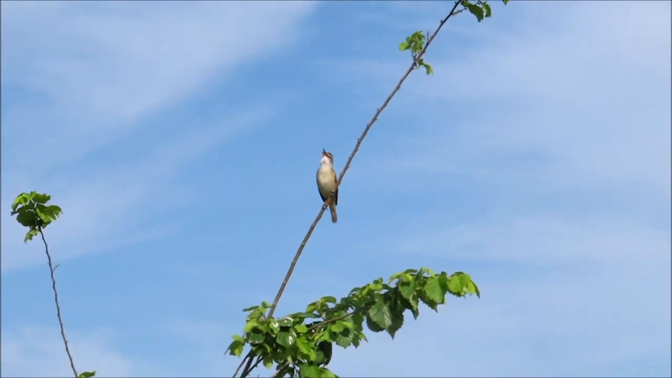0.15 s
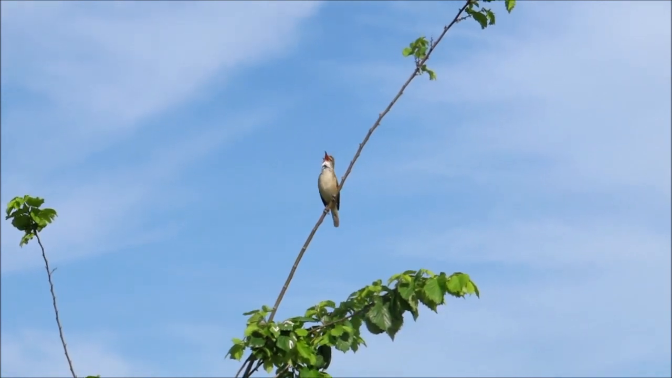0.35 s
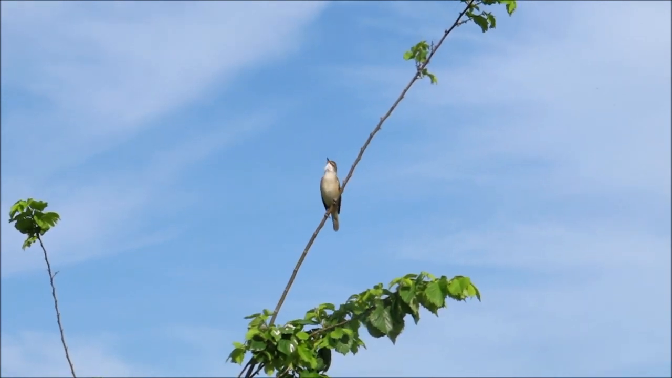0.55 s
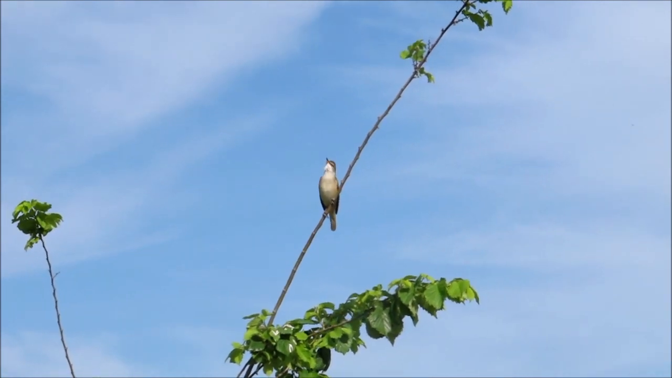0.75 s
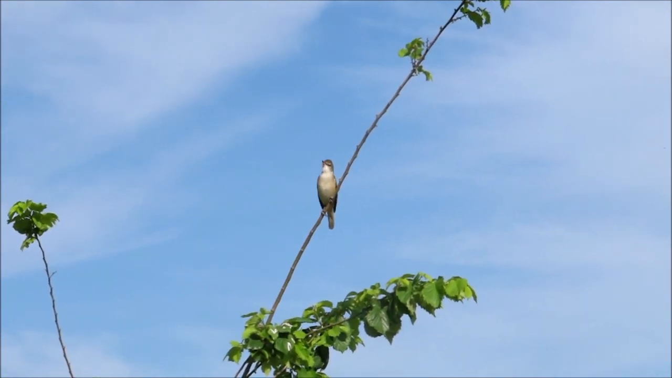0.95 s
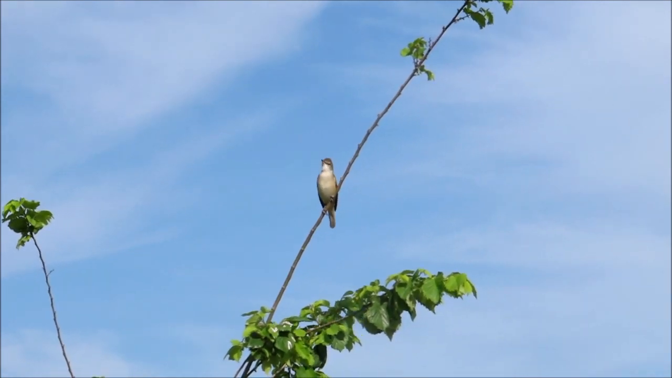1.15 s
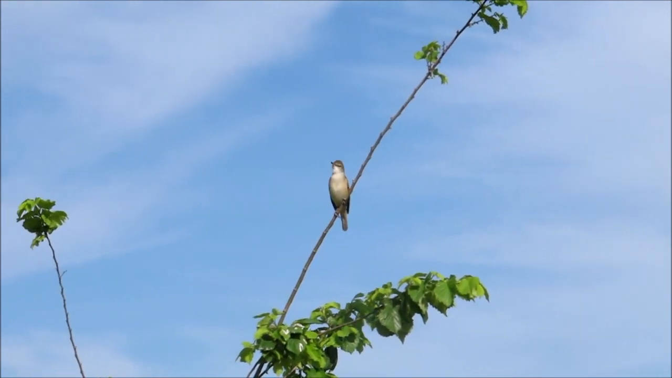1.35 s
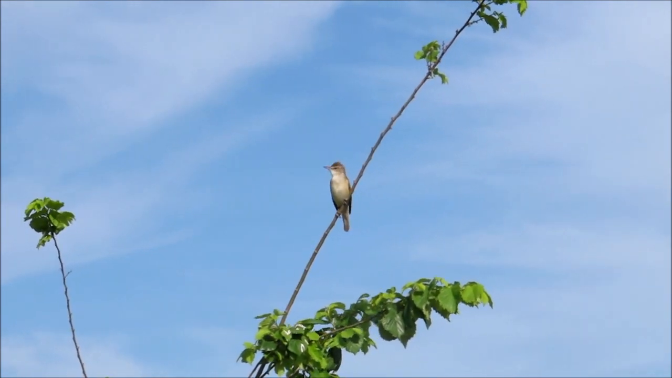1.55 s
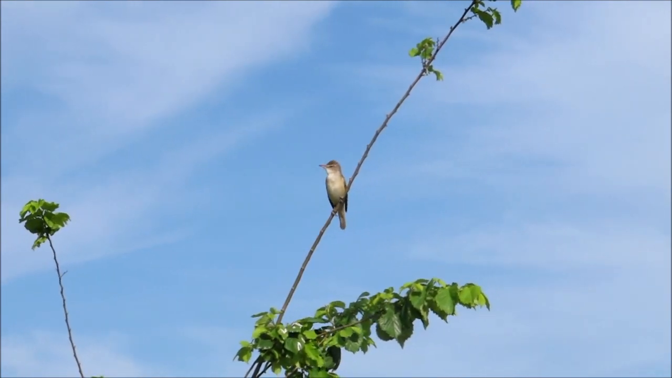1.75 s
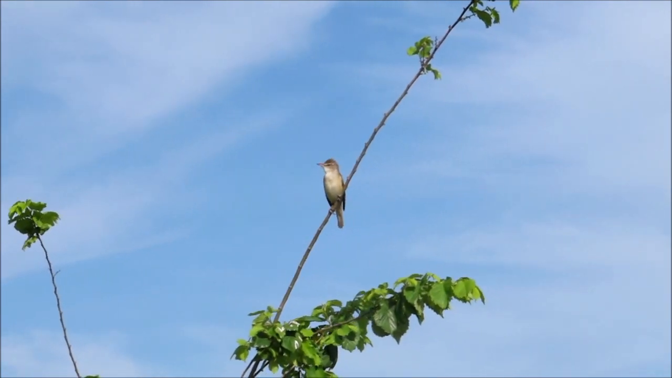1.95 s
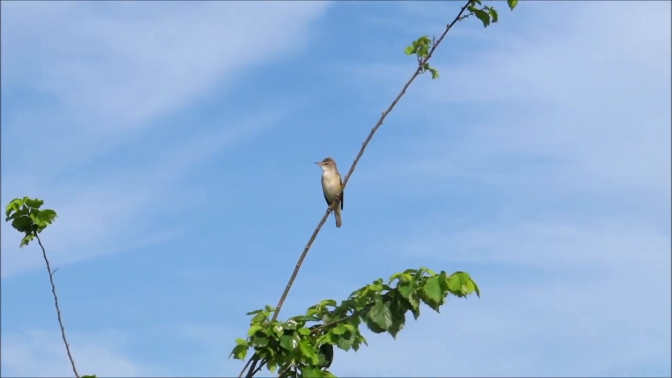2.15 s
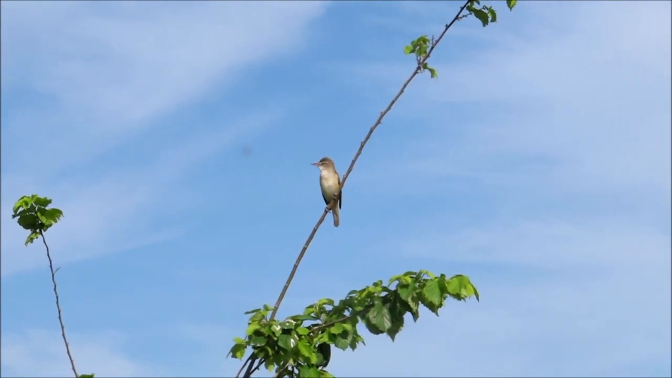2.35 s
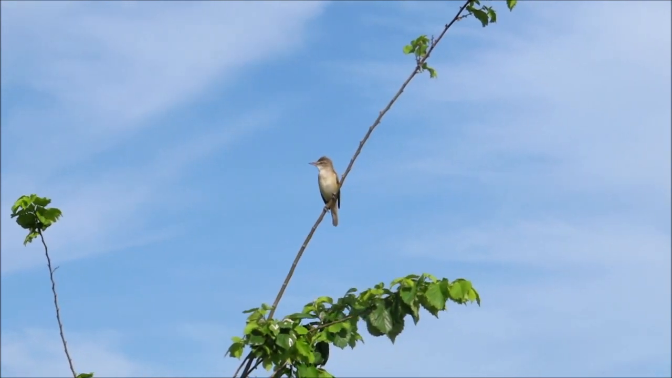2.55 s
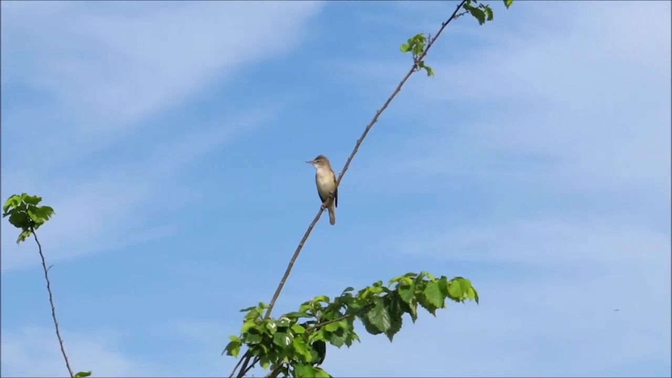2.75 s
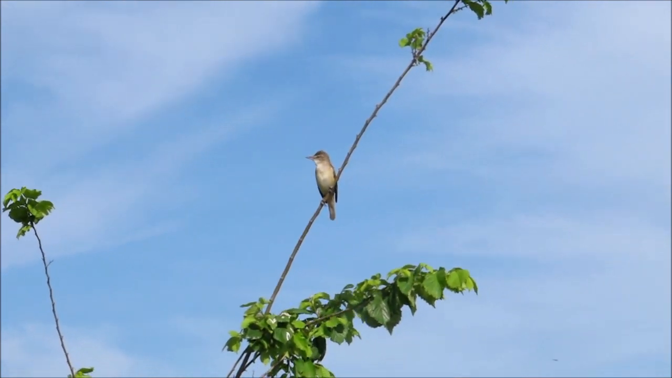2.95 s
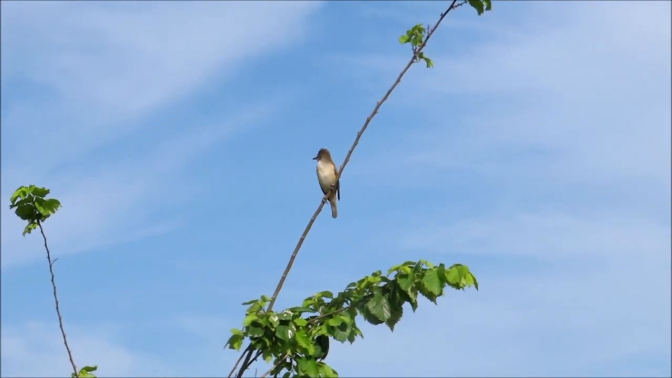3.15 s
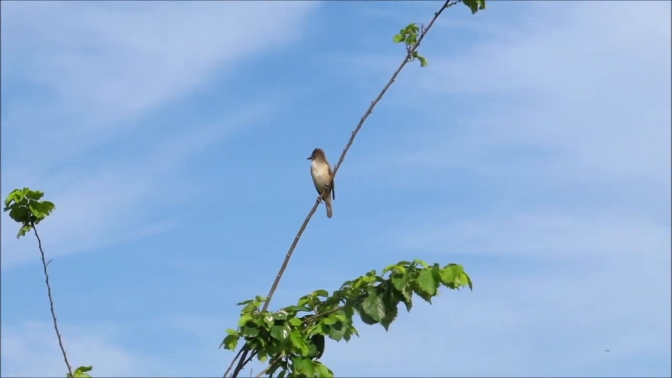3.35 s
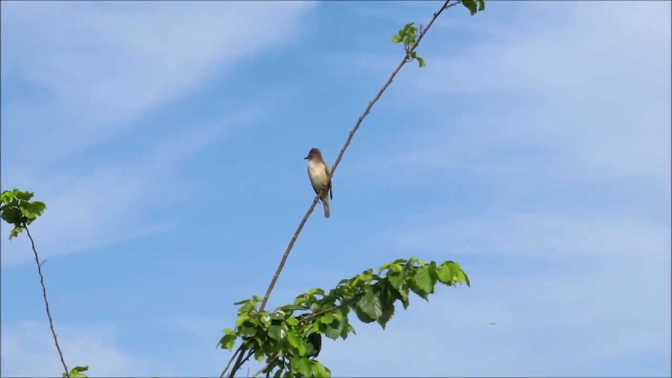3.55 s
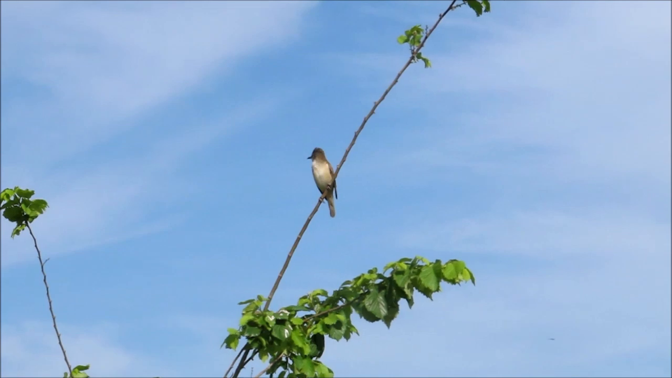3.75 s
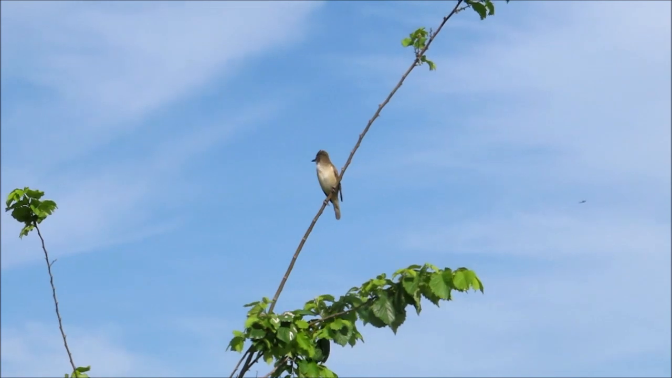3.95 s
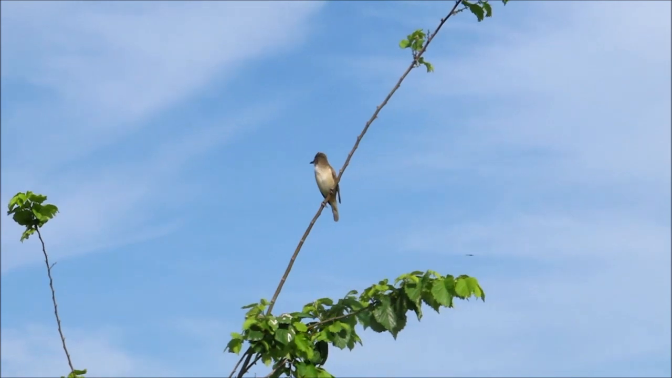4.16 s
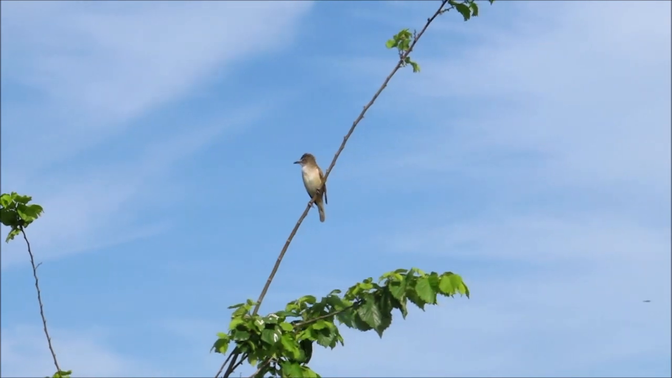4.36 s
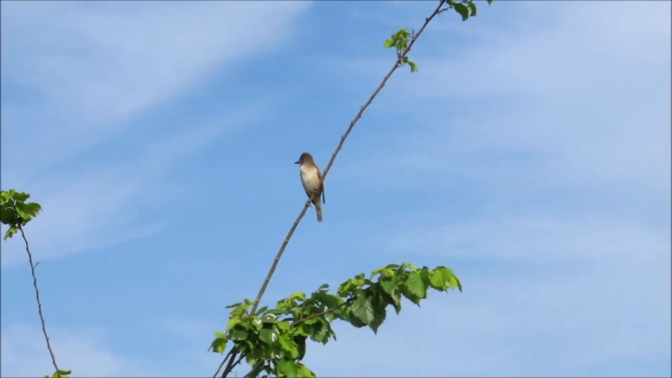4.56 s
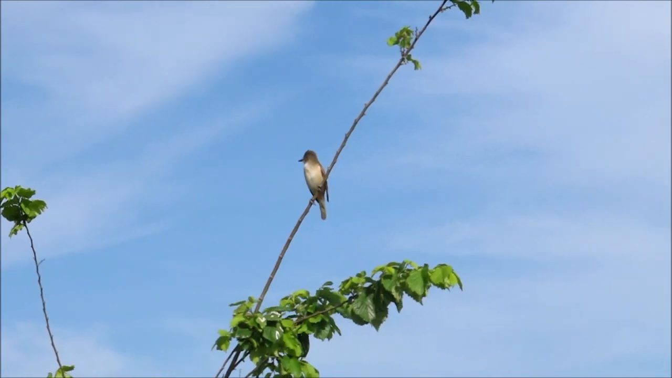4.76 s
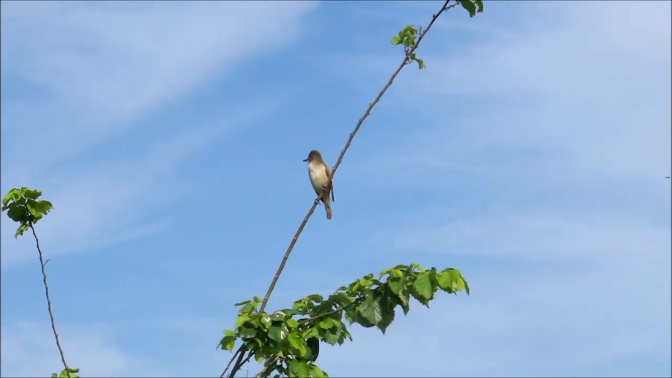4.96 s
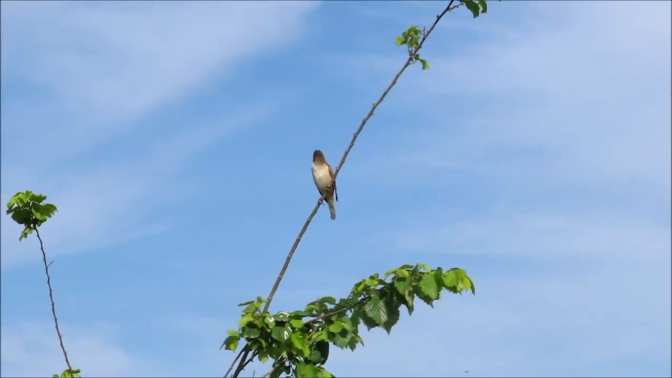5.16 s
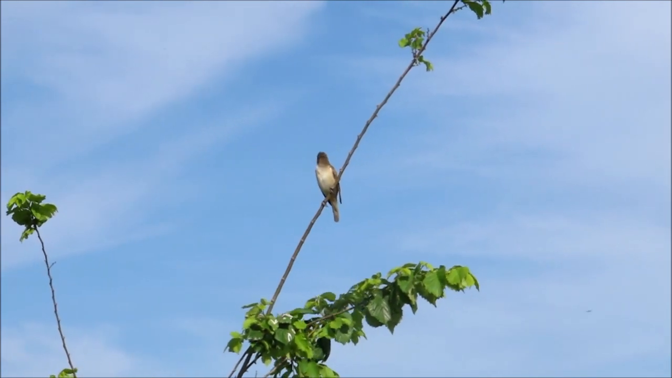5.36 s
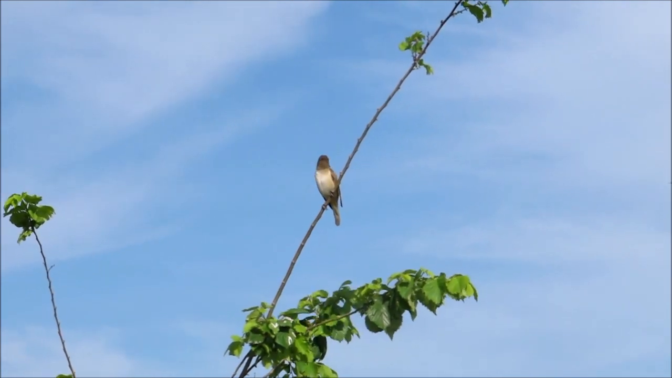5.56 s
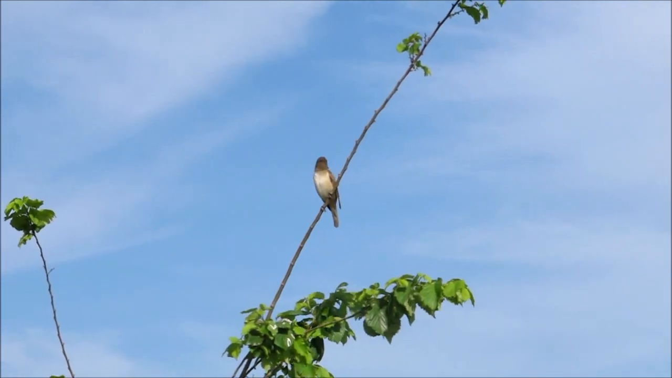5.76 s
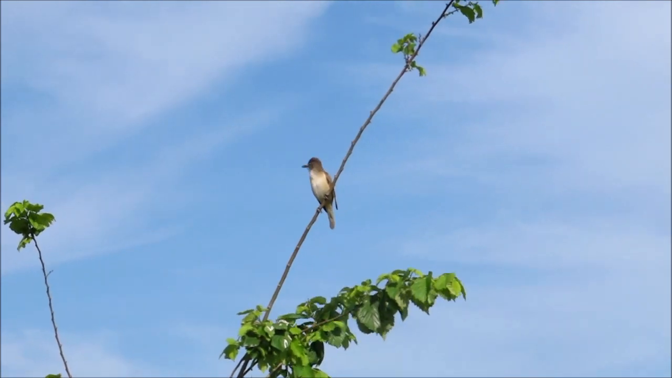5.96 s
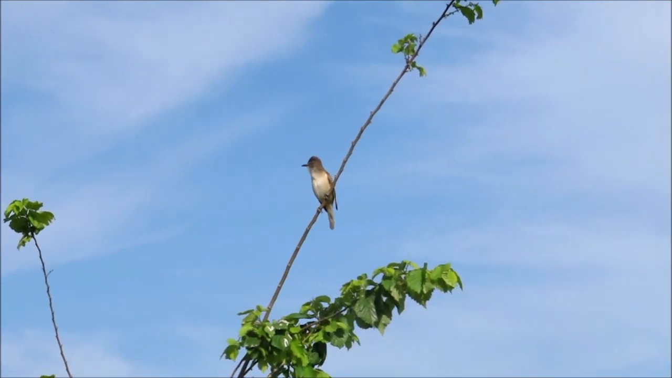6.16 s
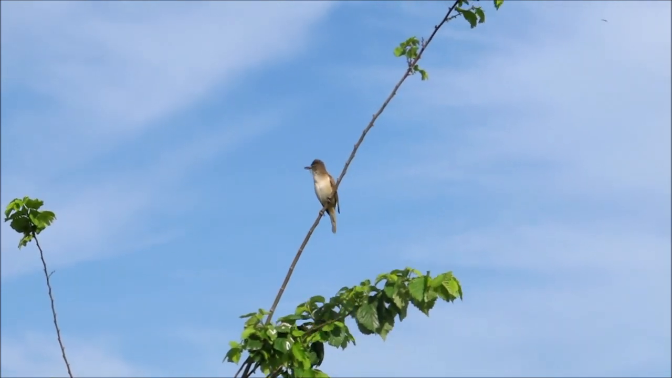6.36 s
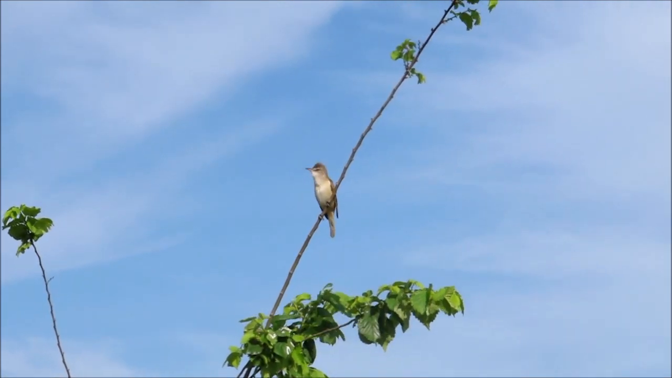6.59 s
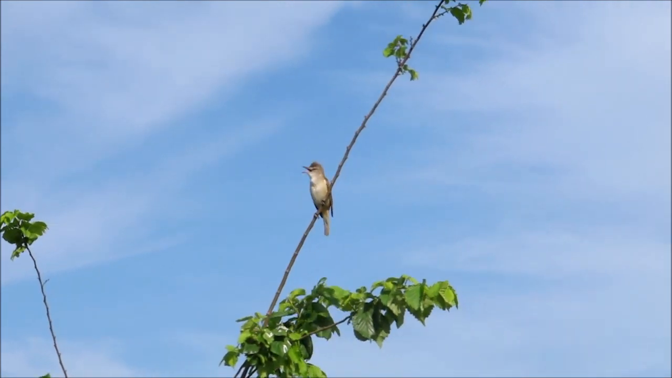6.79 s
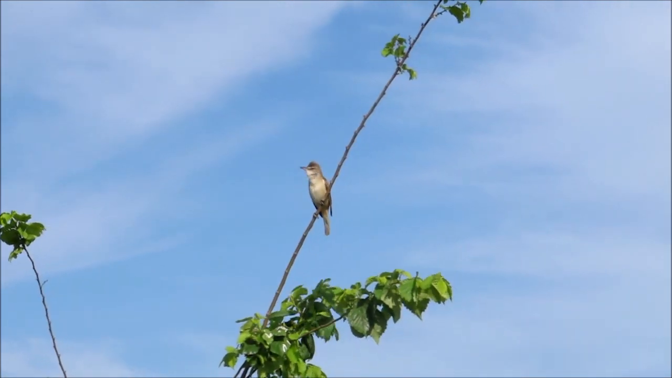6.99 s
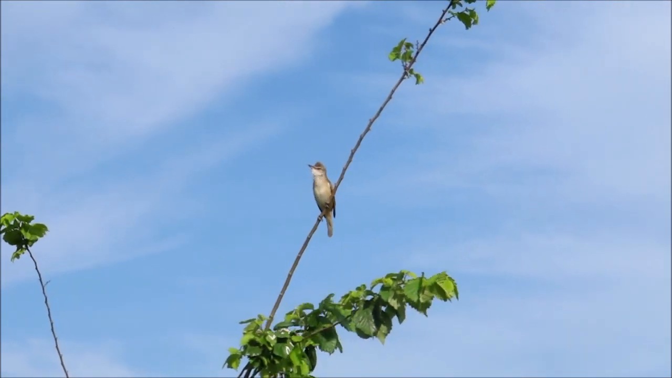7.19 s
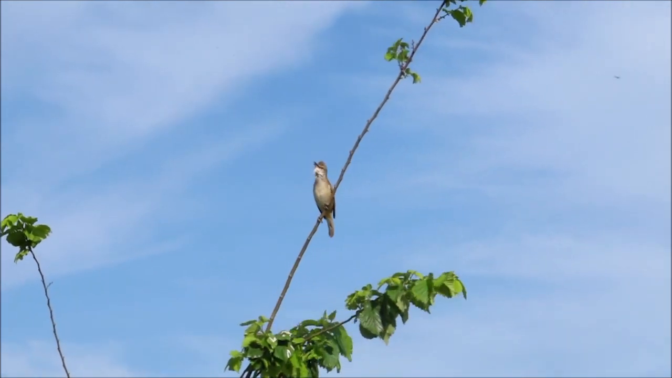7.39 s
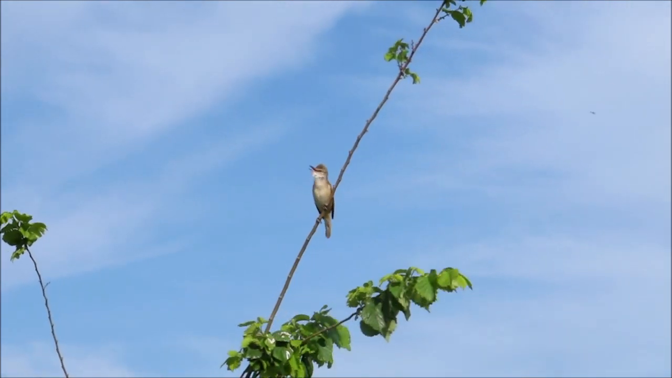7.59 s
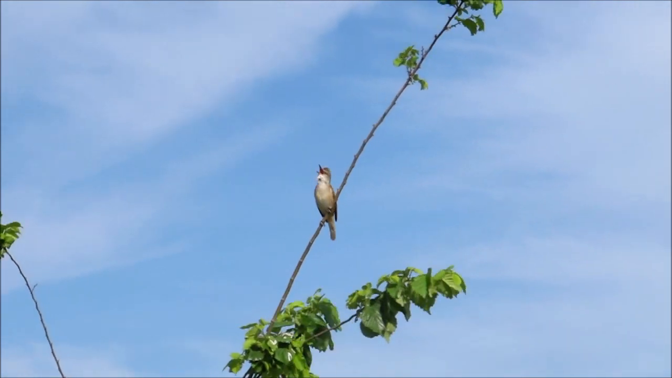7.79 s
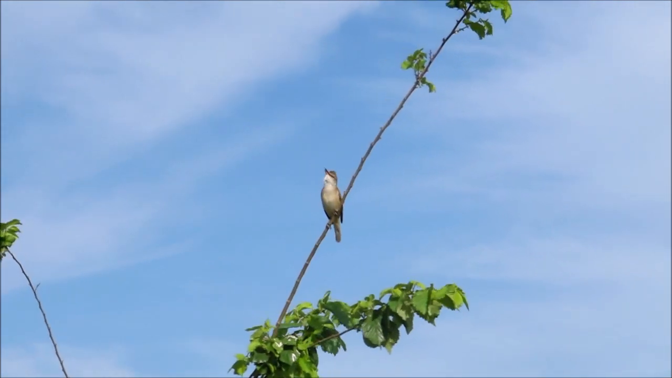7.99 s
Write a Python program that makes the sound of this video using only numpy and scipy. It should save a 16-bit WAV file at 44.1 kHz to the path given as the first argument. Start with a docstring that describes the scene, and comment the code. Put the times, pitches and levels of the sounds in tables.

```python
"""A warbler by a windy river

A warbler pushes puffs of air through its throat to make grating croaks. After a long pause it sings
a thin, falling "seep", more croaks and two bright whistles. Behind it a river washes and hisses, and
far birds chirp faintly. Gusts of wind buffet the microphone's two openings, called ports."""
import sys
import numpy as np
from scipy import signal
from scipy.fft import rfft, irfft
from scipy.io import wavfile
from scipy.ndimage import uniform_filter1d

SR = 44100
rng = np.random.default_rng(int(sys.argv[2]) if len(sys.argv) > 2 else 0)


def master_out(mix):
    """Clip the mix to full scale and print it as 16-bit PCM to the path in sys.argv[1]."""
    frames = np.transpose(np.atleast_2d(mix))
    ceiling = np.clip(frames, -1, 1)
    pcm = np.round(ceiling * 32767).astype(np.int16)
    wavfile.write(sys.argv[1], SR, pcm)


N = 354120

# The tone of the river's three layers, and of the wind. Each row: frequency in Hz, relative level in dB.
RUMBLE_TONE = [(12, -40), (20, -4), (65, -1.5), (110, -6.5), (190, -25), (300, -62), (900, -81)]
WASH_TONE = [(60, -11), (190, 5), (270, 1.5), (650, -0.5), (1040, -2), (1500, -4), (2450, -13.5),
             (4500, -34)]
HISS_TONE = [(900, -33.5), (1800, -5), (2700, -4), (3500, -2.5), (4800, 3.5), (5500, 4), (6200, -4),
             (6900, -8), (8300, -17), (10300, -23), (13000, -33), (15500, -45)]
WIND_TONE = [(12, -35), (20, -6), (54, 5.5), (97, -0.5), (142, -9.5), (172, -13), (277, -24.5), (558, -37),
             (900, -49), (1170, -82), (1980, -120)]
# How loud the wash and hiss are heard: turned down by the recorder's automatic gain after the opening
# croaks, then recovering and gently swelling.
# Each row: time in seconds, then relative levels of wash and hiss in dB.
BACKGROUND_LEVELS = [(0.0, -53.5, -48.5), (0.71, -55, -53.5), (1.43, -50, -50), (1.94, -50, -48.5),
                     (3.87, -49.5, -49.5), (4.16, -46.5, -49), (4.38, -50, -48), (5.1, -50, -48),
                     (5.63, -46.5, -48.5), (6.26, -50.5, -47.5), (6.55, -52, -49.5), (7.02, -50, -49),
                     (8.03, -52, -47.5)]
# One list per windy spell. Each row: time in seconds, strength in dB, left minus right in dB.
GUSTS = [
    [(0.2, -55, -6), (0.25, -26, -4), (0.298, -25, 13), (0.35, -56, 0), (0.496, -34.5, 7), (0.69, -47, -6),
     (0.85, -36.5, -18), (1.0, -37.5, -1.5), (1.22, -39.5, 6), (1.45, -40, -1)],
    [(6.05, -37.5, 1), (6.236, -37, -3), (6.33, -28.5, 12), (6.374, -18, -8), (6.44, -14.5, 29),
     (6.48, -19.5, 1), (6.6, -9, -0.5), (6.704, -23, 0), (6.848, -24, 5), (6.892, -5, -5.5),
     (6.936, -23, -10), (7.06, -23.5, 5), (7.124, -31, 4.5), (7.19, -16, -5), (7.28, -30.5, 14),
     (7.388, -39, 3), (7.454, -31.5, 6), (7.56, -50, 0), (7.642, -22, -1), (7.72, -26.5, -2),
     (7.812, -36.5, 6), (7.894, -35.5, 9.5), (8.03, -54, 3)],
]
# The hardest swirls of air. Each row: time in seconds, peak in dB, width in ms, port (0 left, 1 right).
BIG_EDDIES = [(6.38, 1.5, 2.83, 0), (6.398, -13, 10, 0), (6.4294, 1, 3.8, 0), (6.503, -11, 5.2, 1),
              (6.53, -2, 3.2, 0), (6.5387, -8, 2.04, 1), (6.608, -7, 4.3, 1), (6.8752, -3.5, 5.3, 0),
              (6.8898, -3, 4.6, 0), (6.8933, -4, 1.8, 1), (7.197, -15, 2, 0)]
# Far birds. Each row: start and length in seconds, first and last pitch in Hz, relative level in dB.
FAR_CHIRPS = [(3.253, .04, 3050, 2930, -48.5), (3.483, 0.028, 4400, 4300, -46),
              (3.53, 0.061, 4500, 4450, -48), (3.72, .025, 3680, 3660, -54), (4.05, .05, 3450, 3350, -53),
              (4.203, 0.077, 3460, 3150, -47), (4.519, .065, 3500, 3290, -47),
              (4.679, 0.054, 3480, 3270, -45.5), (4.99, .035, 2620, 2620, -47)]
# How the ports hear a sound in front.
# Each row: frequency in Hz, left minus right in dB, left's lead in radians.
FROM_FRONT = [(1500, 1.5, -.3), (2800, 2, -.5), (3900, 4, -.55), (4800, 4, -.8), (5850, .8, -2.1),
              (6800, -8.8, -2.1), (7800, -10.5, -1.2), (9700, -12, -.8), (11700, -6.7, -.7), (13600, -8, 0)]
# The same for sound from all round. Each row also ends with how alike the ports are, from 0 to 1.
FROM_AROUND = [(60, 1.2, -.1, .88), (600, 1.85, -.17, .92), (1400, 1.6, -.25, .72), (2750, 2.4, -1.3, .4),
               (4100, 6.8, -3.1, .45), (4900, 9, -4, .5), (5600, 6, -4.9, .45), (6900, -6, -5.6, .42),
               (7800, -7.4, -5.7, .27), (10300, -3, -6.3, .17), (13500, 0, -6.3, .4)]
# A croak's harmonics. Each entry: level in dB at 1, 2, 3.. times half the strongest pitch.
CROAK_HARMONICS = [-26, 0, -21, -37, -42, -41]
# Where the throat rings in a rasp. Each row: frequency in Hz, width in Hz, relative level in dB.
THROAT_RINGS = [(1710, 900, -2.5), (2425, 150, 2), (3100, 800, 8.5), (4020, 330, 6.5), (4784, 550, 5.5)]
# The pulses of air in each kind of syllable. Each row: delay in ms, level change in dB,
# pitch change in semitones, length in ms, roughness from 0 to 1.
SYLLABLE_PULSES = { "tick": [(0, -4, -0.603, 4, 0.76), (6.3, -0.5, -0.0019, 3.06, 0.24),
                   (13, -4, -0.289, 6, 0.31)], "chack": [(0, 0, 0, 8.2, 0.7),
                   (8.5, -0.5, -0.511, 7.2, 0.17), (15, -10.5, -1.497, 6.74, 0.17)],
                   "stutter": [(0, 2, 0, 6.66, 0.74), (8.5, -1.5, -2, 6.38, 0.35)],
                   "churr": [(0, -2, .6, 8.75, 0.62), (6.5, 0, -0.03, 7.8, 0.08),
                   (13.5, -3, 0.03, 6.3, 0.05), (18.5, -8, -0.69, 8, 0.06)], "grunt": [(0, -1, -2, 7.5, .5),
                   (7, -2, 1.3, 4.5, .45), (13.3, 0, 0, 8, .35), (25.8, -2.5, -4, 7, .4)],
                   "nudge": [(0, -1, 0.51, 3.5, 0.17), (6.5, 1.5, -0.086, 2.9, 0.2),
                   (14, -11.5, -0.196, 6, 0.2)], "cluck": [(0, 1, 0.0076, 8.1, 0.28),
                   (7.5, -15.5, 0.44, 5, .4)], "croak": [(0, 0.5, -0.48, 8.5, 0.28),
                   (7.2, 1.5, 0.055, 10.3, 0.1), (13.8, -4.5, 0.27, 7.3, 0.14)],
                   "rattle": [(0, 0, -0.01, 5.7, 0.24), (8.2, -4, -0.35, 5, 0.15),
                   (18.2, -7.5, -0.11, 6.2, .2), (28.5, -11, -0.69, 7, 0.4)],
                   "scrape": [(0, -15, -9, 6.5, 0.72), (8, -8, -9.5, 5, 0.6), (52.8, 0.5, 1, 12, 0.66),
                   (121, -12, 3, 8.7, 0.7)], }
# The croaking. Each row: start in seconds, kind, level in dB, strongest pitch in Hz, roughness factor.
SYLLABLES = [(0.0106, "tick", -16, 3007, 0.8), (0.0455, "chack", -16.5, 3240, 1.12),
             (0.0715, "stutter", -19, 3100, .9), (0.0906, "churr", -11, 2937, 1.36),
             (0.2552, "tick", -16, 3098, 2.05), (0.2892, "chack", -11.5, 3120, 1.05),
             (0.3173, "stutter", -19.5, 2750, 0.77), (0.3371, "churr", -11, 2860, .95),
             (0.396, "tick", -17, 2940, 0.55), (0.4291, "chack", -16.5, 3130, 0.96),
             (0.4582, "stutter", -25, 3000, 1.4), (0.4775, "churr", -14, 2930, 0.72),
             (6.1052, "grunt", -31, 2370, 0.97), (6.5046, "grunt", -30, 2390, 0.88),
             (7.089, "nudge", -39.5, 1977, 1.86), (7.13, "cluck", -23.5, 2270, 1.14),
             (7.157, "cluck", -19.5, 2250, .9), (7.1725, "croak", -15.5, 2680, 1.3),
             (7.196, "rattle", -19.5, 2310, 1.05), (7.3798, "nudge", -27.5, 2080, .8),
             (7.42, "cluck", -21, 2620, 0.99), (7.4473, "cluck", -18, 2324, 1.14),
             (7.4617, "croak", -13, 2720, 0.79), (7.4849, "rattle", -15.5, 2280, 1.05),
             (7.66, "scrape", -23.5, 4810, 1), (7.8408, "scrape", -21, 4720, 1)]
# How throat and beak shape a whistle's harmonics. Each row: frequency in Hz, relative level in dB.
BEAK_TONE = [(1900, -26), (2800, -7), (3900, -1.5), (5800, -20), (7800, -37), (8500, -40), (9700, -39.5),
             (11600, -36), (13600, -75)]
# The seep's smooth path. Each row: time in seconds, level in dB, pitch in Hz.
SEEP_PATH = [(6.724, -55, 7500), (6.734, -49, 7440), (6.775, -41, 6680), (6.81, -34, 6790),
             (6.832, -31, 6780), (6.85, -32, 6560), (6.872, -28.5, 6470), (6.88, -46, 6480),
             (6.93, -54.5, 6500)]
# A whistle's notes: a quick lead-in, a turn, and a held note that drops away.
# Each row: delay in seconds, level change in dB, pitch change in semitones.
WHISTLE_NOTES = [
    [(0, -19, 0.52), (.009, -16, 0.068), (.018, -10, 0.055)],
    [(.019, -16, -1.03), (.026, -6.5, -0.068), (.033, -8, -0.19), (.04, -23, -0.14)],
    [(.036, -11, -0.9), (.045, -3.5, 0.05), (.058, 0, 0), (.072, -1, 0), (.081, 1.5, .05),
     (.093, -1.5, 0.2), (.099, -4, -1.85), (.104, -12, -2.5), (.109, -34, -1.5)],
]
# The whistles. Each row: start in seconds, level in dB, three note pitches in Hz,
# then the held note's early dip in dB and its extra length in ms.
WHISTLE_CALLS = [(7.676, -10, 3640, 2843, 1943, 0, 1.5), (7.8558, -9.5, 3790, 2804, 1898, 5.5, 2.5)]

TOP_HZ = 15750  # the highest sound let through


def gain_of(db):
    """Turns decibels into a multiplier."""
    return 10 ** (np.asarray(db) / 20)


def unit_level(x):
    """Scales a signal to an average power of 1."""
    return x / np.sqrt(np.mean(x ** 2) + 1e-20)


def look_up(table, hz):
    """Reads a table's other columns at the frequencies hz."""
    f, *columns = np.transpose(table)
    return np.array([np.interp(np.log(hz + 1), np.log(f + 1), c) for c in columns])


def add(mix, s, sound):
    """Mixes a sound in, starting at s seconds."""
    part = mix[round(s * SR):][:len(sound)]
    part += sound[:len(part)]


def wobble(size, top_hz):
    """A smooth random wiggle, mostly slower than top_hz."""
    smooth = signal.butter(2, top_hz, fs=SR, output="sos")
    return unit_level(signal.sosfilt(smooth, rng.standard_normal(size + SR))[SR:])


def river(rumble_db=-20., wash_db=9.5, hiss_db=5.5, patchy_db=.98):
    """Running water: a patchy wash and hiss, heard at BACKGROUND_LEVELS, over a steady rumble."""
    frames, hz = N // 256 + 5, np.fft.rfftfreq(1024, 1 / SR)
    t = np.arange(frames) * 256 / SR
    a, b, c, d, patches = rng.standard_normal((frames, 513, 5)).T
    patches = unit_level(uniform_filter1d(uniform_filter1d(patches, 12, 0), 14, 1))
    s, wash, hiss = np.transpose(BACKGROUND_LEVELS)
    layers = [(RUMBLE_TONE, np.full_like(s, rumble_db)),
              (WASH_TONE, wash + wash_db), (HISS_TONE, hiss + hiss_db)]
    power = sum(gain_of(2 * (look_up(tone, hz).T + np.interp(t, s, db))) for tone, db in layers)
    balance_db, lead, alike = look_up(FROM_AROUND, hz)[:, :, None]
    alike = np.clip(alike, 0, 1)
    left, unrelated = a + 1j * b, c + 1j * d
    right = (alike * left * np.exp(-1j * lead) + np.sqrt(1 - alike ** 2) * unrelated) / gain_of(balance_db)
    spectra = np.array([left, right]) * np.sqrt(power) * gain_of(patchy_db * patches)
    return signal.istft(spectra, nperseg=1024, noverlap=768)[1][:, :N] / 8


def far_birds(waver=.013):
    """Distant chirps: soft tones that waver as they glide."""
    out = np.zeros(N)
    for s, length, start_hz, end_hz, db in FAR_CHIRPS:
        n = round(length * SR)
        hz = np.linspace(start_hz, end_hz, n) * (1 + waver * wobble(n, 90.))
        level = gain_of(db + 2.1 * wobble(n, 120.)) * signal.windows.tukey(n, .6)
        add(out, s, np.sqrt(2) * level * np.sin(2 * np.pi * np.cumsum(hz) / SR))
    return out


def small_eddies(above_db, gap_s=.014, peak_db=-12.5, spread_db=1, min_ms=1.2, max_ms=3.06):
    """Random little swirls in the hardest gusts, as rows like BIG_EDDIES."""
    slots = np.arange(0, N / SR, gap_s)
    late, size, width, port = rng.random((len(slots), 4)).T
    s = slots + late * gap_s
    gust_db = np.max([np.interp(s, *np.transpose(rows)[:2], -99, -99) for rows in GUSTS], 0)
    columns = [s, peak_db + spread_db * (2 * size - 1), min_ms + (max_ms - min_ms) * width, port]
    return list(np.transpose(columns)[gust_db > above_db])


def wind(calm_db=-39., lumpy_db=3., cap_db=-18.):
    """Gusts make lumpy low noise at each port; eddies suck the microphone's membrane in with a thump."""
    t = np.arange(N) / SR
    tone = gain_of(look_up(WIND_TONE, np.fft.rfftfreq(N, 1 / SR))[0])
    gusts = [np.transpose(rows) for rows in GUSTS]
    out = np.zeros((2, N))
    for port, side in enumerate((.5, -.5)):
        spells_db = [np.interp(t, s, db + side * pan_db, -99, -99) for s, db, pan_db in gusts]
        power = sum(gain_of(2 * np.minimum(db, cap_db)) for db in spells_db)
        noise = irfft(rfft(rng.standard_normal(N)) * tone, N)
        lumps = gain_of(lumpy_db * np.clip(wobble(N, 25.), -2, 1.3))
        out[port] = np.sqrt(np.maximum(power - gain_of(2 * calm_db), 0)) * unit_level(noise * lumps)
    around_s = np.arange(-.03, .03, 1 / SR)
    for s, db, ms, port in BIG_EDDIES + small_eddies(cap_db):
        x = (around_s / ms * 1900) ** 2
        thump = -gain_of(db) * (1 - .5 * x) * np.exp(-x / 3)  # a dip with a rebound each side
        add(out[round(port)], s - .03, thump)
    return out


def riverbank(x, fade_s=.42, tail_db=-19., echo_db=-32., echo_s=.068):
    """Reeds and trees scatter the song into a thin tail; the far bank sends back one soft echo."""
    slots = np.arange(200, SR // 2, 20)
    delays = slots + rng.integers(0, 20, (2, len(slots)))
    bounces = rng.choice([-1., 1.], delays.shape) * gain_of(-60 * delays / SR / fade_s)
    echoes = np.zeros((2, SR // 2 + 20))
    np.put_along_axis(echoes, delays, bounces, 1)
    echoes *= gain_of(tail_db) / np.linalg.norm(echoes[0])
    echoes[:, round(echo_s * SR)] += gain_of(echo_db)
    left, right = signal.fftconvolve(x[None], echoes, axes=1)[:, :N]
    balance_db = look_up(FROM_AROUND, np.fft.rfftfreq(N, 1 / SR))[0]
    return np.array([left, irfft(rfft(right) / gain_of(balance_db), N)])


def ports(x):
    """The right port hears the left port's sound with a different tone and timing."""
    db, lead = look_up(FROM_FRONT, np.fft.rfftfreq(N, 1 / SR))
    return np.array([x, irfft(rfft(x) * gain_of(-db) * np.exp(-1j * lead), N)])


def air_pulses():
    """Yields each puff's time in seconds, level in dB, pitch in Hz, length in ms and roughness."""
    for s, kind, db, hz, rougher in SYLLABLES:
        for delay_ms, change_db, semitones, ms, rough in SYLLABLE_PULSES[kind]:
            yield s + delay_ms / 1000, db + change_db, hz * 2 ** (semitones / 12), ms, rough * rougher


def croaks(rise=.8, throb_db=2.2, jitter=.055, sag=.025, focus_db=8.):
    """Puffs of air drive a voice whose pitch sags in each one; rough puffs break into rasp and throbs."""
    t = np.arange(N) / SR
    power, pitch, harsh = np.full((3, N), 1e-12)
    for s, db, hz, ms, rough in air_pulses():
        span = slice(max(round((s - .03) * SR), 0), round((s + .03) * SR))
        late = (t[span] - s) / ms * 2000  # half-lengths past the peak
        puff = gain_of(2 * db) * 4. ** -(np.where(late < 0, -late / rise, late * rise) ** 3)
        power[span] += puff
        pitch[span] += puff * hz / 2 * (1 - sag * np.clip(late, -2, 2))
        harsh[span] += puff * np.clip(rough, 0, 1)
    pitch, harsh = pitch / power, np.minimum(harsh / power, 1)  # louder puffs count for more
    cycles = np.cumsum(pitch * (1 + jitter * np.sqrt(harsh + .063) * wobble(N, 530.))) / SR
    tone = np.sqrt(2) * sum(gain_of(db) * np.cos(2 * np.pi * k * cycles)
                            for k, db in enumerate(CROAK_HARMONICS, 1))
    air = rng.standard_normal(N)
    # the throat favours the rings near the pitch it is tuned to
    weights = [gain_of(db - focus_db * abs(np.log2(hz / (2 * pitch)))) for hz, _, db in THROAT_RINGS]
    rasp = sum(w * unit_level(ring(air, hz, width)) for w, (hz, width, _) in zip(weights, THROAT_RINGS))
    rasp /= np.sqrt(sum(w ** 2 for w in weights))
    airy_top = unit_level(ring(ring(air, 7300, 2550), 7300, 2550))
    breath = gain_of(-38) * airy_top * (1 + 2.1 * harsh)
    throb = gain_of(throb_db * np.sqrt(harsh) * np.clip(wobble(N, 320.), -2, 1.2))
    voice = np.sqrt(1 - harsh) * tone + np.sqrt(harsh + .0049) * rasp + breath
    return np.sqrt(power) * throb * voice


def ring(x, hz, width_hz):
    """A resonance: keeps the sound near hz, filtering twice for steep sides."""
    b, a = signal.iirpeak(hz, hz / width_hz, SR)
    return signal.lfilter(b, a, signal.lfilter(b, a, x))


def seep(switch_s=6.831):
    """The path of a thin falling note whose pitch and level warble together, then flutter quickly."""
    s, db, hz = np.transpose(SEEP_PATH)
    t = np.arange(s[0], s[-1], .0005)
    flutter = t > switch_s
    rate_hz = np.where(flutter, 145., 46.)
    swing_db, swing_hz = np.where(flutter, 3.5, 4.5), np.where(flutter, 40., 130.)
    swing = np.cos(2 * np.pi * rate_hz * (t - switch_s))
    return t, np.interp(t, s, db) + swing_db * swing, np.interp(t, s, hz) + swing_hz * swing


def whistle(s, db, lead_hz, turn_hz, held_hz, dip_db, linger_ms):
    """Yields the paths of three notes; the held one may stay soft at first and end later."""
    dip_s = (.04, .072, .08)  # begins, deepest, over
    for note, hz in zip(WHISTLE_NOTES, (lead_hz, turn_hz, held_hz)):
        delay, change_db, semitones = np.transpose(note)
        change_db = change_db - dip_db * np.interp(delay, dip_s, [0, 1, 0])
        times = s + delay + (delay > dip_s[2]) * linger_ms / 1000
        yield times, db + change_db, hz * 2 ** (semitones / 12)


def sing(mix, path, tone_db, waver, grit_db):
    """Adds a wavering note along a path of times, levels and pitches; swirling air shakes its level."""
    s, db, hz = path
    t = np.arange(s[0] - .002, s[-1] + .0034, 1 / SR)
    hz = np.interp(t, s, hz) * (1 + waver * wobble(len(t), 294.))
    db = np.interp(t, s, db)
    harmonic_hz = np.arange(1, 8)[:, None] * hz
    weight_db = tone_db(harmonic_hz) - 99 * (harmonic_hz > TOP_HZ)
    weight_db += .12 * (db + 3) * (harmonic_hz > 6500)  # soft notes lose their top
    waves = np.cos(2 * np.pi * np.cumsum(harmonic_hz, axis=1) / SR)
    note = (gain_of(weight_db - weight_db.max(0)) * waves).sum(0)
    grit = 1 + gain_of(grit_db) * wobble(len(t), 868.)
    fade = signal.windows.tukey(len(t), 300 / len(t))
    add(mix, t[0], np.sqrt(2) * gain_of(db) * note * grit * fade)


def warbler():
    """The whole song at the left port: croaks, whistles and the almost pure seep."""
    song = croaks()
    for call in WHISTLE_CALLS:
        for path in whistle(*call):
            sing(song, path, lambda hz: look_up(BEAK_TONE, hz)[0], waver=.0035, grit_db=-22.)
    sing(song, seep(), lambda hz: -55 * np.log2(hz / hz[0]), waver=.01, grit_db=-24.)
    return song


def scene():
    """Birds, river and wind in stereo; the far birds carry a much bigger share of echo."""
    song, far = warbler(), far_birds()
    return ports(song + gain_of(-3.) * far) + riverbank(song + gain_of(13.) * far) + river() + wind()


def record(dry):
    """Gently squashes the loudest peaks, then cuts the sound above TOP_HZ."""
    squashed = np.sign(dry) * (.6 + .39 * np.tanh((abs(dry) - .6) / .3))
    limited = np.where(abs(dry) < .6, dry, squashed)
    treble_cut = signal.firwin(511, TOP_HZ, window=("kaiser", 9), fs=SR)
    return signal.oaconvolve(limited, treble_cut[None], "same")


dry = scene()
out = record(dry)
master_out(out)
```